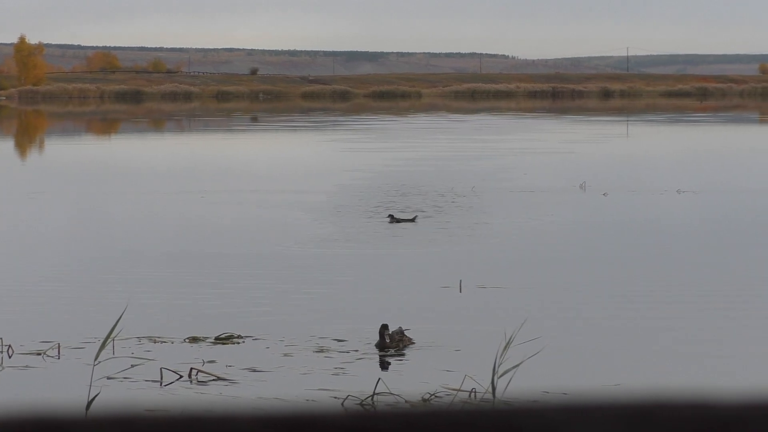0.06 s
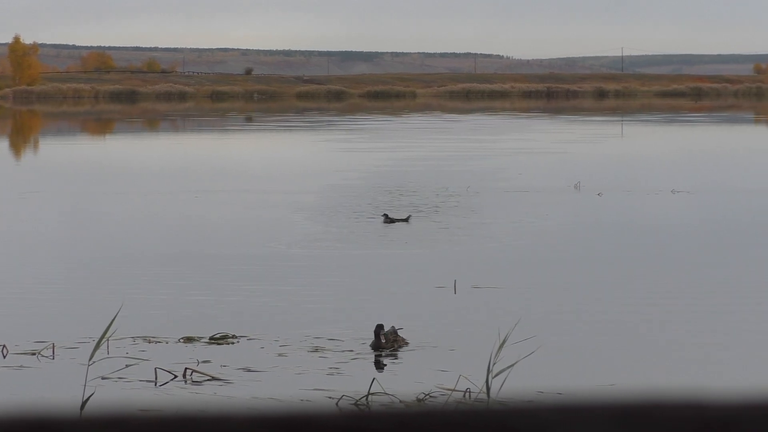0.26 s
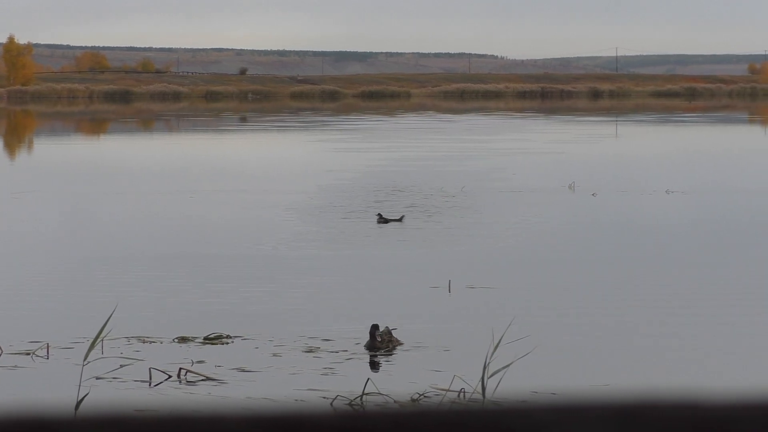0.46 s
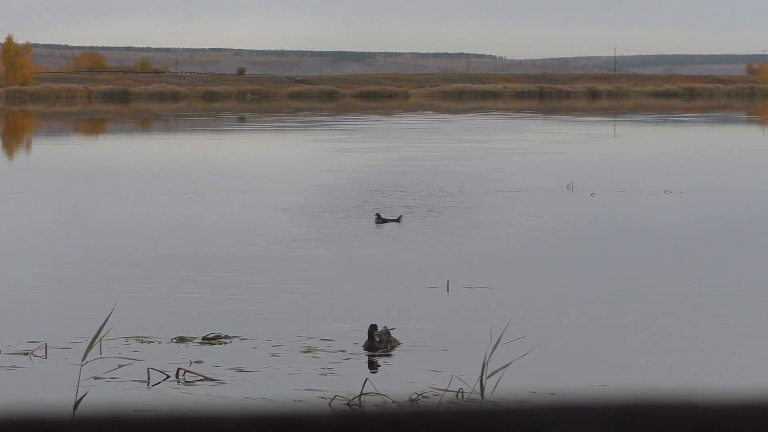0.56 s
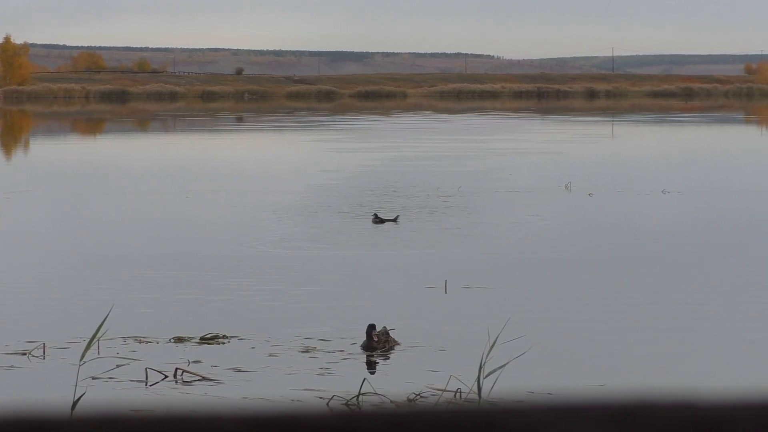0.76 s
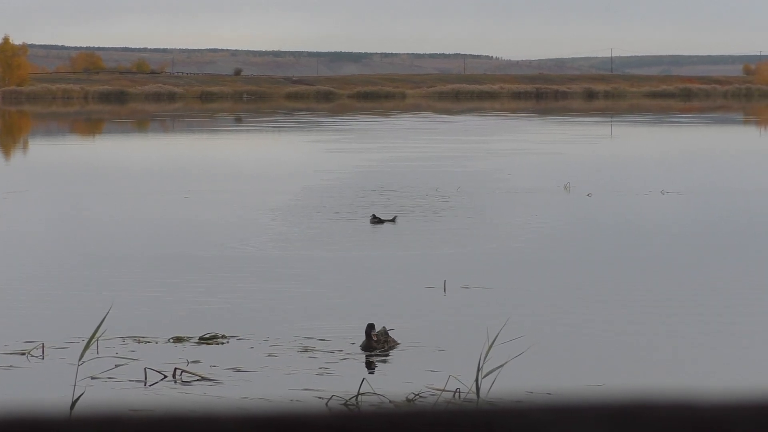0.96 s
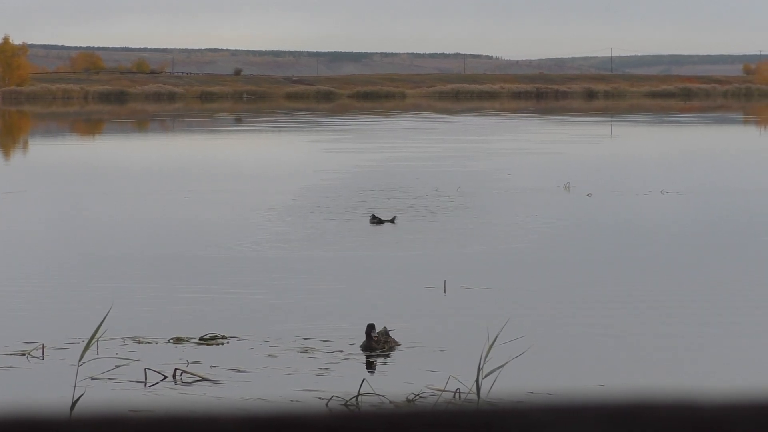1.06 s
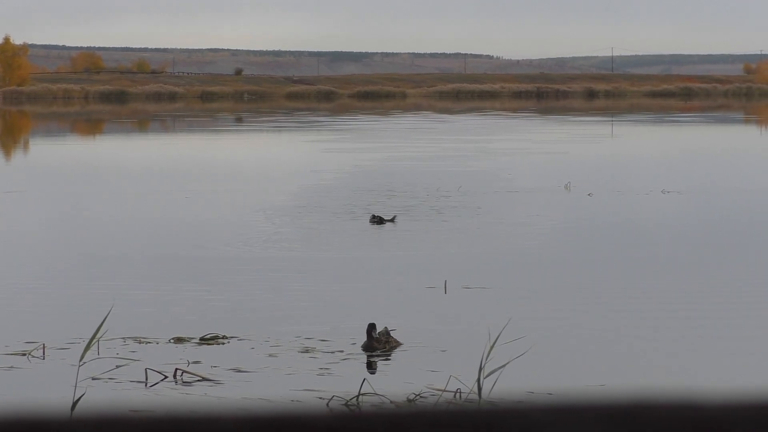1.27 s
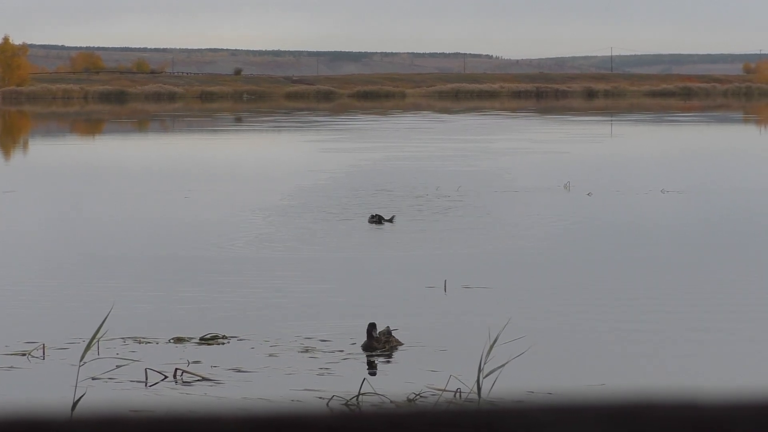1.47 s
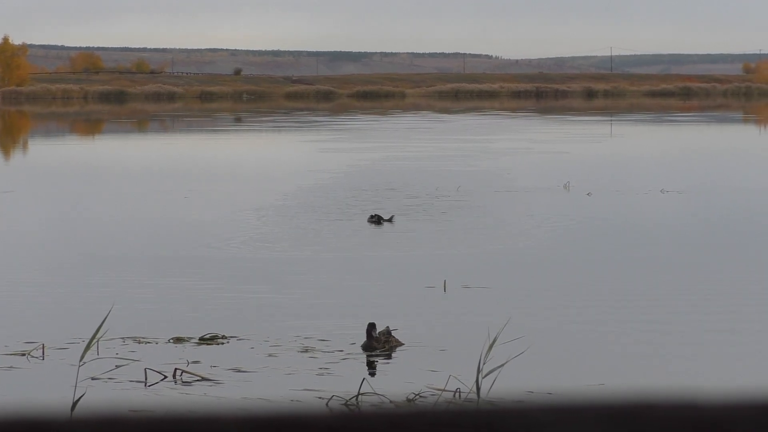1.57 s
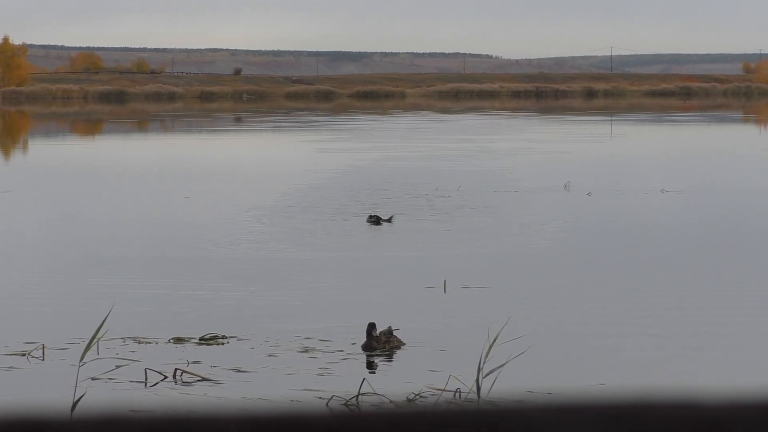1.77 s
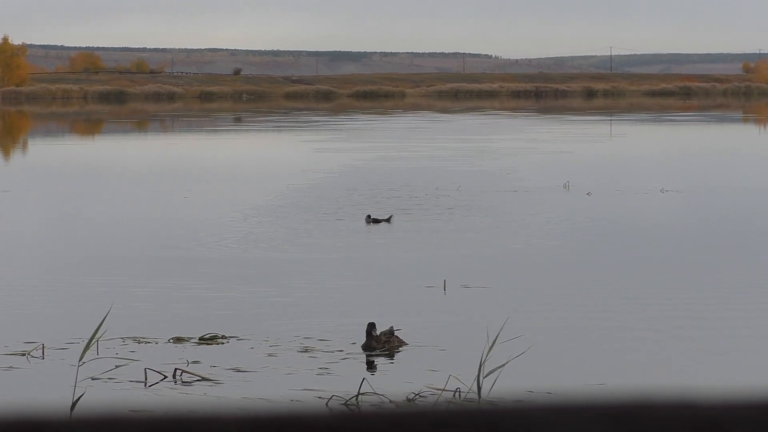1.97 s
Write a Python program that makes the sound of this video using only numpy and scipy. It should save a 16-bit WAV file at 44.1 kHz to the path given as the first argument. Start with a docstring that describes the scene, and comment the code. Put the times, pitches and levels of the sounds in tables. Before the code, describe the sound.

Two short, nasal duck quacks sound close to the microphone, about a second apart, the first led by a soft grunt. Light handling scuffs fall between them, and a rustle and sharp knock follow, over a faint lakeside hush.

```python
"""Duck call on a still lake

A duck call blown close by gives a soft grunt and two reedy quacks. Its vibrating reed is a harmonic
source shaped by resonances: each quack starts as a low rasp, climbs to a clear nasal tone and breaks
off roughly. Between and after the quacks a hollow object is handled nearby: a bump, scuffs, a rustle
and a sharp knock. Near things and the shore reflect the calls over a faint outdoor hush."""
import sys
import numpy as np
from scipy import signal
from scipy.fft import rfft, irfft, next_fast_len
from scipy.io import wavfile

SR = 44100
rng = np.random.default_rng(int(sys.argv[2]) if len(sys.argv) > 2 else 0)


def to_wav(sig):
    """Store sig (one row per channel, or 1-D mono) as 16-bit WAV at the path in sys.argv[1].

    Samples outside -1..1 are clipped; the rate is SR.
    """
    pcm = np.clip(np.atleast_2d(sig), -1, 1) * 32767
    pcm = np.round(pcm).astype(np.int16)
    wavfile.write(sys.argv[1], SR, pcm.T)  # frames by channels


N = 89302
TIME = np.arange(N) / SR
FFT_SIZE = 2 * next_fast_len(N * 5 // 8, True)
FREQS = np.maximum(np.fft.rfftfreq(FFT_SIZE, 1 / SR), 1)
FADE_S = 0.0018

# Fundamental of each quack, which climbs, levels off, lifts and drops: t/s, f/Hz
QUACK_PITCHES = [
    [(.241, 120.6), (.275, 153.1), (.335, 184.2), (.38, 200.3), (.45, 207.9), (.495, 207.4), (.511, 212.5),
     (.53, 184.6)],
    [(1.223, 122.4), (1.272, 163.2), (1.335, 193.8), (1.385, 206.9), (1.445, 208.6), (1.47, 212.9),
     (1.5, 212.2), (1.52, 196)],
]
# Per quack: release t/s, source level/dB, swell depth/dB, swell time/s, closing rasp t/s, treble/dB
QUACKS = [(0.51, -12, 24, 0.037, 0.499, 3.5), (1.493, -11.5, 16.5, 0.046, 1.488, -0.5)]
# Resonance curve of the quacks: f/Hz, level/dB
QUACK_RESPONSE = [(200, -24), (380, -17), (520, -24), (850, -25), (1100, -26), (1850, -16.5), (2200, -10),
                  (2520, -10), (2750, -17), (3400, -21), (3750, -29.5), (4800, -26), (5400, -33.5),
                  (6800, -38), (9200, -47.5), (11500, -71)]
def quack(pitch_curve, release_s, level_db, swell_db, swell_s, rough_from_s, treble_db):
    """Source-filter voicing: rasp is jitter, shimmer and a puff of noise at each reed pulse."""
    open_db, clear_db, close_db = -12, -27, -6  # rasp at the start, middle and end
    release_db_per_s, shimmer_db = 801.5, 9
    age = np.maximum(TIME - pitch_curve[0][0], 0)
    released = np.maximum(TIME - release_s, 0)
    soft_db = swell_db * np.exp(-(age / swell_s) ** 2)
    envelope = np.minimum(age / FADE_S, 1) * from_db(level_db - soft_db - release_db_per_s * released)
    opening = np.exp(-(age / 0.12) ** 4)
    closing = np.clip((TIME - rough_from_s) / 0.017, 0, 1)
    rasp = from_db(clear_db + (open_db - clear_db) * opening + (close_db - clear_db) * closing)
    jitter = (0.0004 + 0.017 * rasp * (1 + closing)) * drift(130)
    cycles = np.cumsum(in_time(pitch_curve)[0] * (1 + jitter)) / SR
    on, tone = envelope > 1e-4, np.zeros(N)
    tone[on] = reed(cycles[on], age[on], (opening + closing)[on], soft_db[on], treble_db)
    tone *= from_db(shimmer_db * rasp * np.tanh(drift(110)))
    voiced = interference(coloured(envelope * tone, QUACK_RESPONSE))
    puffs = np.exp(-3.5 * (2 * cycles % 1)) * rng.standard_normal(N)  # two pulses per cycle
    hiss = unit_rms(interference(coloured(puffs, QUACK_RESPONSE, db_per_octave=2)))
    return high_pass(voiced + envelope * rasp * hiss, hz=140)


# Harmonics that the reed stresses or weakens: harmonic number, level/dB
REED_HARMONICS = [(1, -18), (3, -13.5), (6, 10), (7, 12.5), (8, 6), (9, 17), (10, 12), (11, 14), (13, 2),
                  (15, -6), (22, -10)]
def reed(cycles, age, strain, soft_db, treble_db):
    """Periodic vibration gives a harmonic series; random phase modulation makes its top hoarse."""
    levels = np.array([dict(REED_HARMONICS).get(k, 0) for k in range(64)])
    phases = np.angle(minimum_phase(levels))
    slow, fast = np.linspace(0, .4, 12), np.linspace(0, .4, 60)
    tone = 0
    for k in range(1, len(levels)):
        waver, shake = [np.interp(age, t, rng.standard_normal(len(t))) for t in (slow, fast)]
        high = min(k / 25, 1) ** 2
        clear_db = -6 * (k > 12 and k % 2 == 0) * (1 - strain)
        strain_db = 3.5 * (12 <= k <= 16) * strain
        dark_db = .5 * soft_db * ((k == 2) - high)  # darker while still soft
        flicker_db = (0.96 + 5 * high) * waver
        gain = from_db(levels[k] + clear_db + strain_db + dark_db + high * treble_db + flicker_db)
        hoarseness = high * (rng.standard_normal() + 0.76 * (1 + 2 * strain) * shake)
        tone += gain * np.cos(2 * np.pi * k * cycles + phases[k] + hoarseness)
    return tone


# Fixed dips from a nearby reflection: f/Hz, depth/dB
REFLECTION_NOTCHES = [(650, 8), (915, 15), (1260, 13), (1715, 17), (2040, 9), (2325, 11), (2680, 15),
                      (3060, 7), (4070, 16)]
def interference(x, width_hz=44.2):
    """Destructive interference: climbing harmonics fade and return as they cross the notches."""
    dips_db = sum(depth * np.exp(-((FREQS - hz) / width_hz) ** 2) for hz, depth in REFLECTION_NOTCHES)
    return filtered(x, minimum_phase(-dips_db))


# Course of the grunt: t/s, half the pulse rate f/Hz, level/dB
GRUNT_CONTOUR = [(.008, 145.2, -48.5), (.028, 148.7, -29), (.05, 145, -30), (.075, 160.3, -31.5),
                 (.098, 167, -51.5)]
# Resonance curve of the grunt: f/Hz, level/dB
GRUNT_RESPONSE = [(120, -41), (320, -9.5), (560, -6.5), (760, -5), (1200, 2), (1900, -7.5), (2300, -3.5),
                  (2600, -10.5), (3100, -1.5), (4300, -37.5), (7000, -36.5), (14000, -69)]
def grunt():
    """A jittered pulse train and noise excite broad resonances in one short, low call."""
    half_rate, level_db = in_time(GRUNT_CONTOUR)
    pulse_count = np.floor(2 * np.cumsum(half_rate * (1 + 0.0054 * drift(170))) / SR)
    pulses = np.diff(pulse_count, prepend=0)
    source = unit_rms(pulses - pulses.mean()) + from_db(-4) * rng.standard_normal(N)
    inside_s = np.minimum(TIME - GRUNT_CONTOUR[0][0], GRUNT_CONTOUR[-1][0] - TIME)
    gate = np.clip(inside_s / FADE_S + 1, 0, 1)
    return unit_rms(coloured(source, GRUNT_RESPONSE)) * from_db(level_db) * gate


# A hard knock made of three contacts in quick succession: t/s, energy level/dB
KNOCK_CONTACTS = [(1.783, 6.5), (1.785, 8), (1.786, -13)]
# Response of the struck object: f/Hz, level/dB
KNOCK_RESPONSE = [(88, -62), (150, -24), (348, -22.5), (805, -21), (1290, -1.5), (1760, 1.5), (3100, -5.5),
                  (4080, -16.5), (11300, -31), (16000, -46)]
def knock():
    """Impact: each contact sounds the object's impulse response, and a dense ring dies away."""
    impulses = np.zeros(N)
    for start, db in KNOCK_CONTACTS:
        impulses[int(start * SR)] += from_db(db)
    response_norm = np.linalg.norm(coloured(signal.unit_impulse(N), KNOCK_RESPONSE))
    clicks = coloured(impulses, KNOCK_RESPONSE) / response_norm
    ring = unit_rms(coloured(stereo_noise(), KNOCK_RESPONSE)) * burst(KNOCK_CONTACTS[0][0], t60=0.061)
    return from_left(clicks) + from_db(-11) * ring


# Scuffs on the object: t/s, level/dB, T60/s, tilt/(dB per octave)
SCUFF_STROKES = [(0.915, -25, 0.065, 0.5), (0.957, -31, 0.092, 5), (.988, -26, 0.21, 3),
                 (1.068, -34.5, 0.18, 2), (1.125, -38, 0.086, 7), (1.153, -23, 0.14, 4.5),
                 (1.193, -35.5, 0.39, 0.5)]
# Spectral envelope of a scuff: f/Hz, level/dB
SCUFF_SPECTRUM = [(59, -46), (100, -33), (210, 1), (424, 0), (583, -10.5), (1060, -1.5), (1250, -23.5),
                  (1550, -2.5), (3120, -12), (4110, -18), (5420, -16.5), (16000, -46.5)]
def scuffs(friction):
    """Brief sliding contacts release bursts of friction noise, each with its own brightness."""
    return sum(from_db(db) * burst(start, t60) * unit_rms(coloured(friction, SCUFF_SPECTRUM, tilt))
               for start, db, t60, tilt in SCUFF_STROKES)


# Spectral envelope of the bump: f/Hz, level/dB
BUMP_SPECTRUM = [(40, -61), (100, -0.5), (230, -3.5), (480, -10), (700, -23), (2000, -35.5)]
def bump(friction):
    """Damped vibration: a dull, low noise rises softly and decays exponentially."""
    envelope = from_db(-33) * burst(.904, t60=0.57, attack_s=0.011)
    return envelope * unit_rms(coloured(friction, BUMP_SPECTRUM))


# Swell of the rustle: t/s, level/dB
RUSTLE_LEVELS = [(0, -56), (.2, -54.5), (.88, -58), (1.58, -61), (1.64, -42), (1.72, -29.5), (1.765, -30),
                 (1.81, -43.5), (1.88, -42), (1.94, -47.5), (2.02, -43)]
# Spectral envelope of the rustle: f/Hz, level/dB
RUSTLE_SPECTRUM = [(35, -64), (60, -39), (189, -2.5), (233, -25), (281, 3), (371, -0.5), (682, -10.5),
                   (1470, 1), (5330, -9), (16000, -29.5)]
def rustle():
    """Random amplitude modulation gives grain to a handling noise that swells before the knock."""
    grains = stereo_noise() * from_db(1.6 * drift(390))
    return from_db(in_time(RUSTLE_LEVELS)[0]) * unit_rms(coloured(grains, RUSTLE_SPECTRUM))


# Modes of the hollow object: f/Hz, bandwidth/Hz, gain
BODY_MODES = [(233, 46, 1.64), (438, 60, 0.7), (1165, 133, 3.1)]
def hollow_body(x):
    """Resonance: each mode adds its ring to the excitation."""
    return x + sum(gain * signal.lfilter(*signal.iirpeak(hz, hz / width, fs=SR), x)
                   for hz, width, gain in BODY_MODES)


def reflections(x, level_db, t60):
    """Diffuse reverberation: convolution with exponentially decaying noise."""
    response = stereo_noise() * burst(0, t60)
    response /= np.linalg.norm(response[0])
    return from_db(level_db) * signal.fftconvolve(x[None], response, axes=1)[:, :N]


# Course of the outdoor hush: t/s, level/dB
AIR_LEVELS = [(0, -44), (.6, -51), (.86, -53), (1.2, -44), (1.58, -51)]
# Spectral envelope of the hush: f/Hz, level/dB
AIR_SPECTRUM = [(18, -68), (30, -19.5), (461, -7), (780, -15), (1040, -6), (1160, -29.5), (1250, -11),
                (1760, -15), (16000, -24)]
def air():
    """Faint broadband ambient noise, tinted by the same modes as the handling."""
    hush = coloured(hollow_body(stereo_noise()), AIR_SPECTRUM)
    return from_db(in_time(AIR_LEVELS)[0]) * unit_rms(hush)


# Lag of the right channel: f/Hz, phase/rad
RIGHT_LAG = [(200, 0), (2000, 0.21), (5000, 0.57), (8500, 1.94)]
def from_left(x):
    """Path difference: sound from slightly to the left arrives later on the right."""
    return np.array([x, filtered(x, np.exp(-1j * spectrum(RIGHT_LAG)))])


# Likeness of left and right: f/Hz, coherence (0 to 1)
COHERENCE = [(100, 1), (1000, 0.98), (2500, 0.88), (5000, 0.4), (9000, 0), (14000, 0.2)]
def stereo_noise():
    """White noise with the coherence of a diffuse field: high in the bass, low in the treble."""
    alike = np.clip(spectrum(COHERENCE), 0, .999)
    mid, side = filtered(rng.standard_normal((2, FFT_SIZE)), np.sqrt([1 + alike, 1 - alike]))
    return np.array([mid + side, mid - side])


def from_db(db):
    """Level to amplitude ratio."""
    return 10 ** (np.asarray(db) / 20)


def unit_rms(x):
    """Normalisation to unit power."""
    return x / np.sqrt(np.mean(x ** 2) + 1e-20)


def in_time(rows):
    """Linear interpolation of each column at every sample."""
    times, *columns = np.transpose(rows)
    return [np.interp(TIME, times, column) for column in columns]


def spectrum(points):
    """Interpolation at every bin on a log-frequency axis."""
    hz, values = np.transpose(points)
    return np.interp(np.log(FREQS), np.log(hz), values)


def minimum_phase(db):
    """Folding the cepstrum gives a causal response with these levels."""
    cepstrum = irfft(np.log(from_db(db)))
    half = len(cepstrum) // 2
    cepstrum[1:half] *= 2
    cepstrum[half + 1:] = 0
    return np.exp(rfft(cepstrum))


def filtered(x, response):
    """Convolution as a product of spectra."""
    return irfft(rfft(x, FFT_SIZE) * response)[..., :N]


def coloured(x, curve, db_per_octave=0):
    """Minimum-phase filtering by a tilted level curve."""
    return filtered(x, minimum_phase(spectrum(curve) + db_per_octave * np.log2(FREQS)))


def high_pass(x, hz):
    """Second-order bass roll-off."""
    return signal.sosfilt(signal.butter(2, hz, "high", fs=SR, output="sos"), x)


def drift(hz):
    """Low-passed noise: a smooth fluctuation of unit rms."""
    pole = np.exp(-2 * np.pi * hz / SR)
    return unit_rms(signal.lfilter([1], [1, -2 * pole, pole * pole], rng.standard_normal(2 * N))[N:])


def burst(start, t60, attack_s=0.001):
    """Linear rise and exponential decay."""
    age = np.maximum(TIME - start, 0)
    return np.minimum(age / attack_s, 1) * from_db(-60 * age / t60)


def scene():
    """Superposition of the duck call, its reflections, the handling and the air."""
    call = grunt() + sum(quack(pitch, *row) for pitch, row in zip(QUACK_PITCHES, QUACKS))
    near = reflections(call, level_db=-17, t60=0.051)
    shore = reflections(call, level_db=-32.5, t60=0.65)
    friction = hollow_body(stereo_noise())
    handling = scuffs(friction) + bump(friction) + rustle() + knock()
    return from_left(call) + near + shore + handling + air()


def record(dry):
    """Clipping at full scale, then band limiting of the deep bass and the top."""
    thinned = high_pass(np.clip(dry, -1, 1), hz=50)
    return signal.sosfiltfilt(signal.cheby2(14, 50, 16400, fs=SR, output="sos"), thinned)


dry = scene()
out = record(dry)
to_wav(out)
```